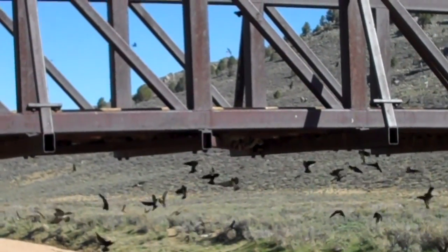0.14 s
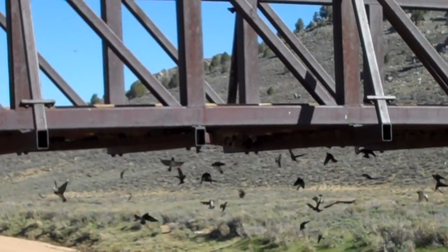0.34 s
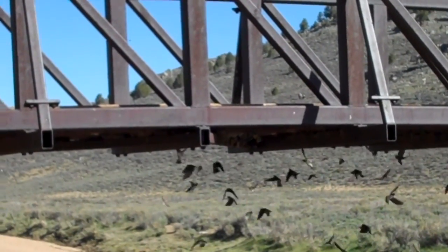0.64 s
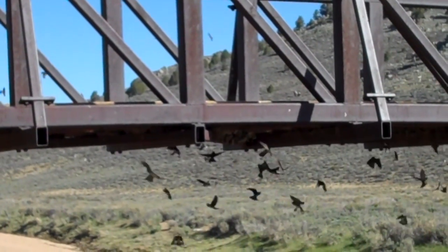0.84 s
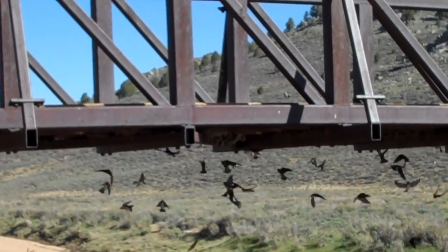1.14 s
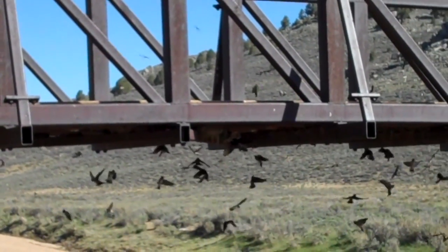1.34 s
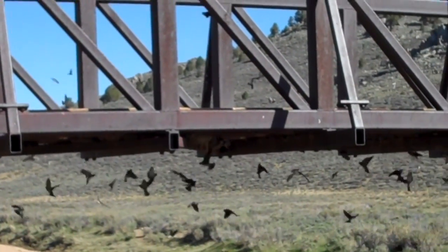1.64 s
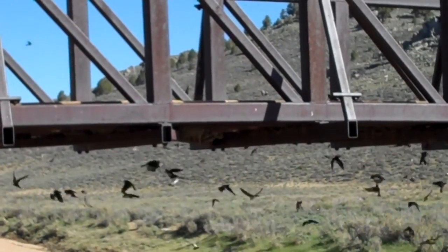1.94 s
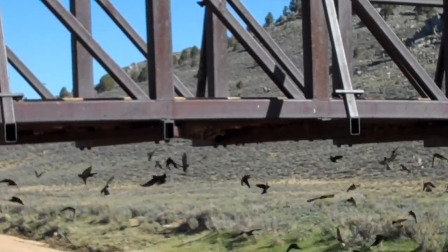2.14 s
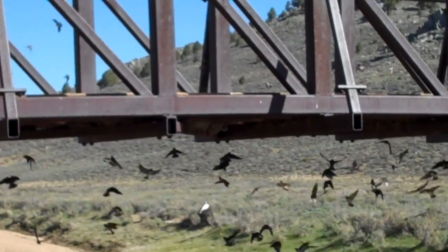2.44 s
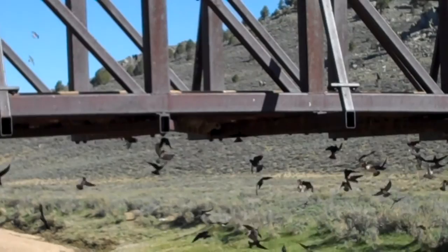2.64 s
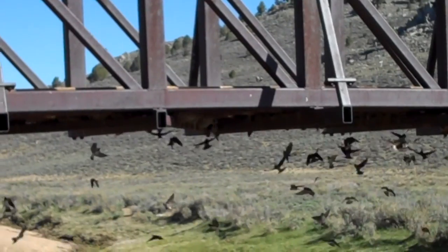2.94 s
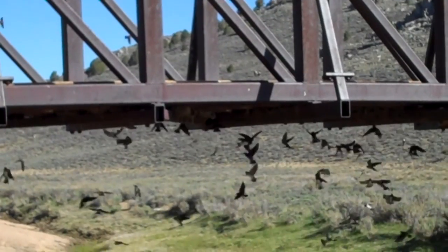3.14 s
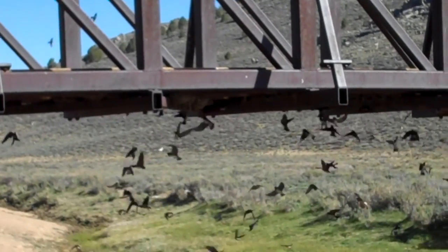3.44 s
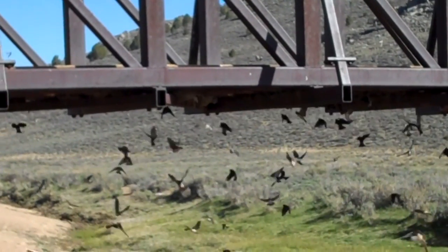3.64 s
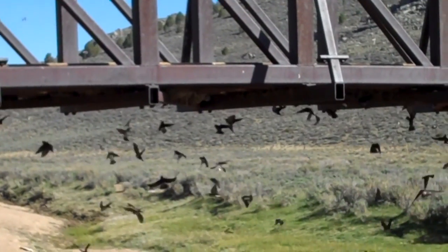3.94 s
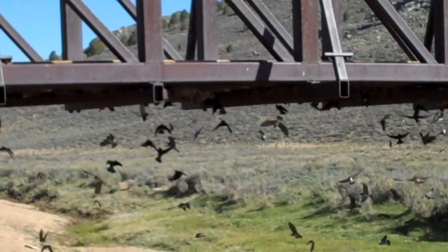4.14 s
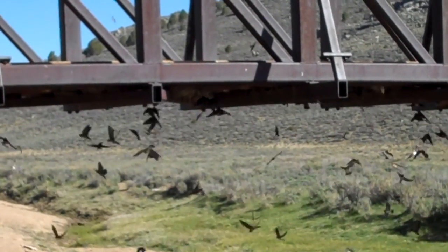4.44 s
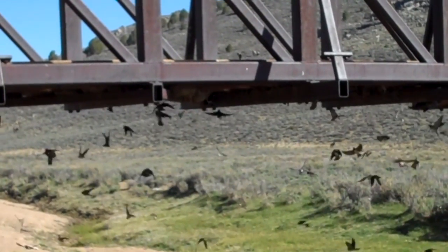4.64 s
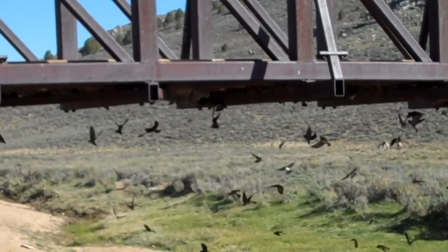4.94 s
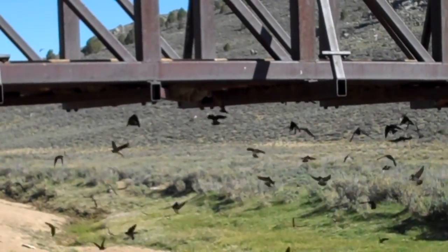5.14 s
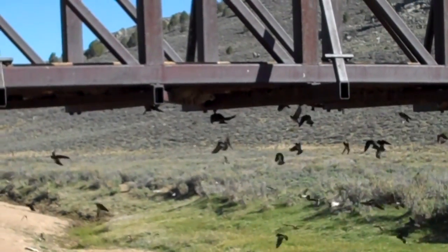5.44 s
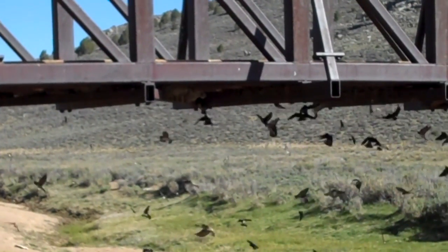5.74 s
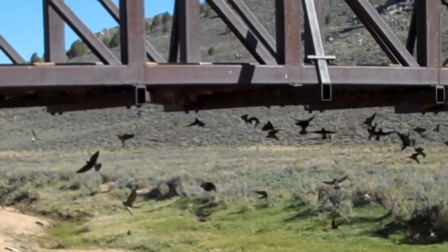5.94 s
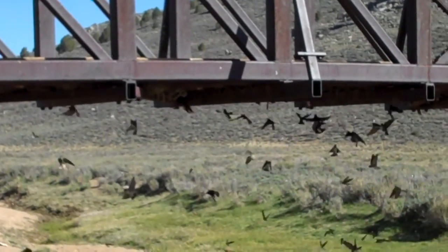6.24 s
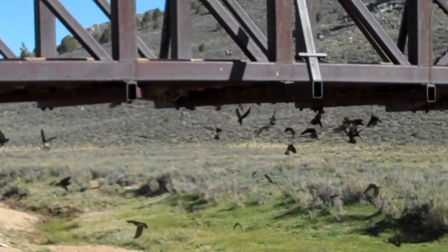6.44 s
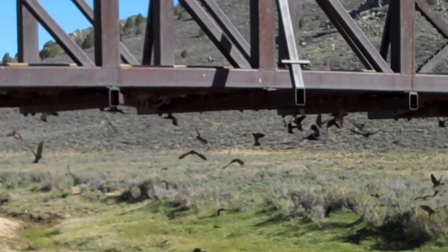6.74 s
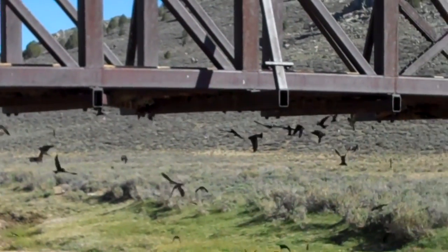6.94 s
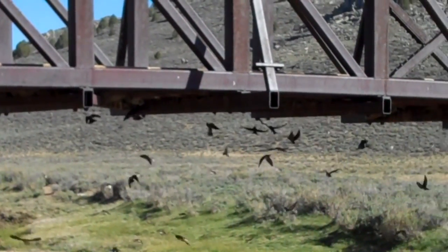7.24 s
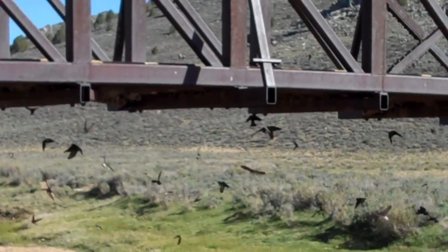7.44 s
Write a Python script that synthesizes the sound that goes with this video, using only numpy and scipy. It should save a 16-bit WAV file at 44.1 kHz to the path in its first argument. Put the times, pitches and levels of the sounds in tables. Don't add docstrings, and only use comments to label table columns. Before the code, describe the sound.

Dense outdoor bird chatter already in full swing: quick gliding squeaks, steep chirps and stronger rough two-toned cries from near swallows, over a constant haze of distant birds. Strong cries crowd the first two seconds, then come more sparsely; late on, small squeaks and snapping ticks remain. Three faint steel pings and one soft low air bump fall near three seconds. Gentle stream noise, brief reflections from bridge and banks, centred mono sound.

```python
import sys
import numpy as np
from scipy import signal
from scipy.fft import rfft, irfft, next_fast_len
from scipy.io import wavfile
from scipy.ndimage import uniform_filter1d, map_coordinates

SR = 44100
rng = np.random.default_rng(int(sys.argv[2]) if len(sys.argv) > 2 else 0)


def generate_wav(signal):
    frames = np.transpose(np.atleast_2d(signal))
    scaled = np.clip(frames, -1, 1) * 32767
    pcm = np.round(scaled).astype(np.int16)
    wavfile.write(sys.argv[1], SR, pcm)


def amplitude_ratio(level_db):
    exponent = np.asarray(level_db, float) / 20
    return 10 ** exponent


N = 335050


def unit(x):
    return x / np.sqrt(np.mean(x ** 2) + 1e-20)


def coloured(x, points):
    m = next_fast_len(N + 8192)
    hz, db = np.transpose(points)
    log_hz = np.log(np.fft.rfftfreq(m, 1 / SR) + 1)
    gain = amplitude_ratio(np.interp(log_hz, np.log(hz + 1), db))
    return unit(irfft(rfft(x, m) * gain, m)[:N])


def wobble(rate_hz, size=N):
    knots = rng.standard_normal(int(size * rate_hz / SR) + 4)
    return map_coordinates(knots, [np.arange(size) * rate_hz / SR])


def bridge(x, wet_db, t60_s=0.32):
    t = np.arange(SR // 3) / SR
    tail = rng.standard_normal(len(t)) * amplitude_ratio(-60 * t / t60_s) * (t > .004)
    tail /= np.linalg.norm(tail)
    return x + amplitude_ratio(wet_db) * signal.fftconvolve(x, tail)[:N]


def bowed(rows, holds):
    return [(s, length, start, end + holds * (start - end), end, db)
            for s, length, start, end, db in rows]


def straight(rows, hz_per_s):
    return [(s, length, hz - hz_per_s * length / 2, hz, hz + hz_per_s * length / 2, db)
            for s, length, hz, db in rows]


def glide_hz(u, start, middle, end):
    return middle + (end - start) * (u - .5) + 2 * (start + end - 2 * middle) * (u - .5) ** 2


GRIT_DB = 1.8
BUZZ_SHARE = .23


def squeaks(rows, overtones_db, flutter_db, waver, edge, buzz=0):
    out = np.zeros(N + SR)
    shake = np.array([wobble(70) for _ in range(7)])
    grit_db = GRIT_DB * wobble(400)
    order = np.arange(1, len(overtones_db) + 1)[:, None]
    for s, length, start, middle, end, db in rows:
        u = np.arange(0, 1, 1 / (length * SR))
        at = round(s * SR)
        part = slice(min(at, N - len(u)), min(at, N - len(u)) + len(u))
        hz = glide_hz(u, start, middle, end) * (1 + waver * shake[-1, part])
        phase = 2 * np.pi * np.cumsum(hz) / SR
        flutter = flutter_db * shake[:len(order), part]
        sizes = amplitude_ratio(np.array(overtones_db)[:, None] + flutter + grit_db[part])
        stack = np.sum(sizes * np.sin(order * phase + order ** 2), axis=0)
        stack *= 1 + buzz * np.cos(BUZZ_SHARE * phase)
        out[at:at + len(u)] += amplitude_ratio(db + 5) * np.sin(np.pi * u) ** edge * stack
    return out[:N]


# start_s, length_s, start_hz, end_hz, level_db
FACING_DUETS = [
    (.392, 0.1, 5040, 2996, -49.5),
    (.96, 0.12, 4300, 3100, -55.5),
    (1.2, .11, 4460, 2830, -47.5),
    (2.074, 0.11, 4240, 2650, -53),
]
# start_s, length_s, start_hz, end_hz, level_db
TURNED_DUETS = [
    (.16, 0.13, 4490, 3040, -49.5),
    (.605, 0.16, 4130, 2460, -54),
    (1.874, 0.13, 4500, 2940, -52),
    (5.9, 0.079, 4400, 3550, -54),
]
# start_s, length_s, start_hz, end_hz, level_db
ARCHED_DUETS = [
    (0.0, 0.099, 4230, 2940, -44.5),
    (3.69, 0.12, 4300, 2940, -50.5),
    (4.3, 0.11, 4260, 2920, -47.5),
    (5.215, 0.12, 4370, 3300, -51.5),
    (.785, .12, 4230, 2810, -53),
    (2.855, 0.13, 4330, 3033, -47),
]
MIX = np.array([(1, 0), (0, 1), (2, 0), (1, 1), (-1, 2), (0, 2), (2, 1), (1, 2), (3, 1), (0, 3), (2, 2)])
MIX_DB = [0, 0.5, -4, -2, -9, -5.5, -11, -13, -18, -20, -20]
# hz, level_db
THROAT = [(1500, -10), (3300, 0.5), (5200, -0.5), (7000, -8), (10000, -6), (14000, -30)]
DUET_HOLDS, ARCH_HOLDS = .4, .74
LOWER_HZ, LOWER_SHARE = 300.7, .5001
BEAM_FROM_HZ, DULL_DB_PER_HZ, BRIGHT_DB = 4400, -0.0066, 2


def duets(flutter_db, edge):
    out = np.zeros(N + SR)
    throat_hz, throat_db = np.transpose(THROAT)
    facing = bowed(FACING_DUETS, DUET_HOLDS)
    turned = bowed(TURNED_DUETS, DUET_HOLDS) + bowed(ARCHED_DUETS, ARCH_HOLDS)
    for k, (s, length, start, middle, end, db) in enumerate(facing + turned):
        u = np.arange(0, 1, 1 / (length * SR))
        at = round(s * SR)
        upper = glide_hz(u, start, middle, end) * (1 + 0.0049 * wobble(90.4, size=len(u)))
        lower = LOWER_HZ + LOWER_SHARE * upper
        hz = np.asarray(MIX) @ np.array([lower, upper])
        flutter = flutter_db * np.array([wobble(76.5, size=len(u)) for _ in MIX])
        sizes_db = np.interp(hz, throat_hz, throat_db) + np.c_[MIX_DB] + flutter
        sizes_db += GRIT_DB * wobble(398, size=len(u))
        if k < len(facing):
            sizes_db += BRIGHT_DB * np.clip((hz - BEAM_FROM_HZ) / 900, 0, 1)
        else:
            sizes_db += DULL_DB_PER_HZ * np.maximum(hz - BEAM_FROM_HZ, 0)
        tones = amplitude_ratio(sizes_db) * np.sin(2 * np.pi * np.cumsum(hz, axis=1) / SR)
        out[at:at + len(u)] += amplitude_ratio(db) * np.sin(np.pi * u) ** edge * tones.sum(axis=0)
    return out[:N]


# start_s, length_s, start_hz, end_hz, level_db
ARCHES = [(.153, .118, 2500, 1990, -50.5), (3.9, .045, 2120, 1780, -55), (0.0, 0.081, 2356, 1700, -49.5),
          (.597, .069, 2195, 1970, -59), (.715, 0.07, 2620, 2510, -58), (1.08, 0.023, 2130, 2010, -52.5),
          (1.11, 0.098, 2050, 2120, -63), (6.475, 0.062, 2385, 1890, -60.5), (2.02, 0.061, 2200, 1850, -58),
          (2.072, 0.074, 2230, 2040, -47.5), (2.307, .1, 2370, 1810, -61),
          (3.195, 0.058, 2000, 1880, -52.5), (3.695, 0.049, 2395, 2297, -53),
          (3.93, 0.057, 2130, 1950, -59), (3.9, .09, 1700, 1247, -58), (4.625, 0.054, 1960, 1640, -52),
          (1.92, 0.053, 2200, 2020, -56.5), (4.255, 0.054, 1755, 1690, -49.5),
          (4.24, 0.059, 2640, 2280, -60.5), (5.497, 0.11, 3090, 2190, -62), (6.316, 0.065, 2480, 2170, -54),
          (6.305, .04, 2130, 1900, -57), (6.225, .075, 2040, 1680, -59), (7.325, 0.15, 1494, 1160, -57.5)]
# start_s, length_s, middle_hz, level_db
SLIDES = [(.2, .068, 1750, -56), (.618, 0.042, 2500, -65), (0.91, 0.038, 2400, -53.5),
          (3.9, 0.043, 1200, -60), (2.347, .118, 1680, -58.5), (3.209, 0.047, 1664, -54.5),
          (4.7, 0.071, 1800, -74), (4.47, .04, 2000, -59), (2.3, 0.053, 1870, -56), (5.3, .05, 2000, -62),
          (3.83, 0.04, 1450, -61), (5.74, .03, 2600, -61), (5.938, .065, 2130, -58),
          (3.305, .04, 2180, -59), (6.025, .04, 2130, -52), (4.35, .04, 2050, -56), (.85, .04, 1680, -55.5),
          (7.3, 0.15, 1700, -73), (6.861, .064, 1800, -57), (7.105, 0.057, 2150, -55.5)]
# start_s, length_s, middle_hz, level_db
DIVES = [(.031, .045, 2600, -65), (.205, 0.083, 2700, -66), (1.005, 0.047, 2470, -51),
         (1.172, .048, 2650, -59), (1.935, 0.04, 2760, -67), (2.434, 0.073, 2510, -59),
         (3.064, 0.046, 2560, -69), (3.268, .05, 2750, -60), (4.756, 0.056, 2650, -58),
         (5.267, 0.067, 2765, -58), (5.738, 0.041, 2490, -78), (6.01, 0.045, 2820, -59),
         (6.066, 0.06, 2380, -54), (6.565, 0.027, 2520, -66), (6.85, .04, 2760, -63),
         (7.183, 0.063, 2500, -60), (7.37, 0.071, 2586, -55.5), (2.85, 0.029, 2580, -55),
         (2.14, 0.059, 2420, -55), (1.88, 0.046, 2750, -64), (.45, .055, 2600, -55),
         (3.165, 0.051, 2630, -59.5), (4.34, 0.039, 2650, -59), (7.54, 0.062, 2070, -55)]
# start_s, length_s, middle_hz, level_db
PIPS = [(.937, 0.095, 2260, -57), (1.288, 0.023, 2590, -53), (1.601, 0.029, 1800, -54.5),
        (1.805, 0.02, 2540, -56), (2.156, 0.011, 2750, -54), (2.553, 0.13, 1452, -59.5),
        (2.68, .065, 1670, -53), (3.39, .08, 1680, -63), (3.372, 0.095, 2050, -63),
        (3.523, 0.043, 1660, -65), (3.636, .04, 2120, -54), (4.751, 0.087, 2240, -57),
        (4.919, .051, 1910, -60), (5.053, 0.033, 2010, -57), (5.36, 0.04, 2860, -63),
        (5.438, .045, 2040, -53.5), (5.355, .05, 1740, -63), (5.366, .039, 1730, -70),
        (5.851, 0.092, 2425, -57.5), (6.431, 0.034, 2100, -57), (6.44, 0.083, 1684, -57.5),
        (6.481, .066, 1370, -57), (6.626, 0.053, 1630, -60), (7.084, 0.051, 1710, -57.5)]
# start_s, length_s, middle_hz, level_db
FLICKS = [
    (.38, 0.035, 1770, -59),
    (1.671, 0.024, 1900, -53),
    (4.72, .04, 2000, -57),
    (4.3, 0.029, 1850, -60),
    (3, 0.017, 2150, -52.5),
    (4.588, 0.041, 1640, -56.5),
    (5.455, .05, 1600, -59),
]
SQUEAK_DB = [-16.5, 0, -18, -26, -35, -39]
SLIDE_HZ_PER_S, DIVE_HZ_PER_S, PIP_HZ_PER_S, FLICK_HZ_PER_S = -6500, -11500, -1800, 6600


def squeaky_calls():
    rows = bowed(ARCHES, ARCH_HOLDS)
    rows += straight(SLIDES, SLIDE_HZ_PER_S)
    rows += straight(DIVES, DIVE_HZ_PER_S)
    rows += straight(PIPS, PIP_HZ_PER_S)
    rows += straight(FLICKS, FLICK_HZ_PER_S)
    return squeaks(rows, SQUEAK_DB, flutter_db=1.5, waver=0.0045, edge=0.3, buzz=.15)


# start_s, length_s, start_hz, end_hz, level_db
SWOOPS = [(0.0, 0.088, 2360, 1980, -62.5), (.969, 0.076, 3170, 2330, -60.5),
          (4.36, 0.032, 2720, 2280, -56.5), (1.52, 0.062, 2080, 1840, -65), (1.655, 0.11, 3020, 2270, -64),
          (2.24, 0.11, 1344, 2410, -68), (2.84, .055, 3000, 2290, -60.5), (3.178, 0.034, 2730, 2270, -57),
          (3.967, .12, 3320, 2594, -66), (4.246, 0.085, 2660, 2280, -65), (4.716, 0.051, 1616, 2220, -63),
          (5.282, 0.047, 2950, 2456, -58.5), (5.972, 0.058, 3640, 2870, -54.5),
          (6.035, 0.069, 2750, 2220, -59.5), (7.058, 0.094, 2650, 2000, -64)]
# start_s, length_s, middle_hz, level_db
LILTS = [(.667, .11, 1910, -63.5), (2.588, 0.12, 1345, -70), (2.733, 0.046, 2180, -57.5),
         (2.829, 0.045, 992, -69), (4.722, 0.13, 1387, -67.5), (4.992, 0.16, 1500, -74),
         (5.967, 0.07, 2036, -60), (6.481, 0.055, 1358, -62), (6.75, 0.11, 1372, -70.5),
         (6.925, 0.05, 1314, -65), (.42, 0.079, 1395, -76), (.61, .1, 1440, -74), (1.07, 0.085, 1070, -77),
         (1.17, 0.067, 1420, -71), (1.86, 0.036, 1238, -71.5), (1.94, .13, 1440, -75),
         (3.44, 0.11, 1510, -77), (5.59, .08, 1514, -69), (5.96, .05, 620, -75), (6.57, .05, 1425, -67),
         (7.03, 0.1, 1624, -71), (7.46, 0.077, 1040, -71.5)]
# start_s, length_s, middle_hz, level_db
HELD = [(.519, 0.18, 2090, -71), (.792, 0.05, 2600, -61), (1.369, 0.042, 2640, -61.5),
        (1.877, 0.052, 2104, -66), (2.33, 0.036, 960, -64.5), (2.93, 0.055, 3500, -59),
        (2.98, 0.087, 2016, -70), (3.349, 0.13, 811, -71), (3.202, .014, 850, -65), (3.24, .012, 820, -69),
        (3.871, 0.13, 1990, -67), (4.455, 0.028, 2730, -60), (5.412, 0.12, 1900, -64),
        (5.607, 0.05, 2013, -67), (6.208, 0.088, 2044, -62.5), (6.31, 0.094, 2360, -62),
        (7.137, 0.067, 1370, -69), (0.0, 0.027, 1035, -67.5), (.1, 0.2, 750, -78.5),
        (.2, 0.19, 1043, -77.5), (.8, 0.11, 772, -78.5), (1.48, 0.17, 1011, -77), (2.58, 0.22, 809, -79),
        (5.27, 0.053, 964, -71.5), (7.41, .06, 1237, -66), (4.0, 0.095, 2680, -60), (5.2, 0.17, 2585, -64)]
MELLOW_DB = [4, -11, -17, -26, -37, -43]
SWOOP_HOLDS, LILT_HZ_PER_S, HELD_HZ_PER_S = .45, 2190, -59


def mellow_calls():
    rows = bowed(SWOOPS, SWOOP_HOLDS)
    rows += straight(LILTS, LILT_HZ_PER_S)
    rows += straight(HELD, HELD_HZ_PER_S)
    return squeaks(rows, MELLOW_DB, flutter_db=2, waver=0.0041, edge=0.41)


def crowd(count, spread_db):
    when, long, pitch, fall, bend, size = rng.random((count, 6)).T
    start_s = (np.arange(count) + 2 * when) / (count + 2) * N / SR
    length_s = .025 + .065 * long
    start = 1700 + 1300 * pitch
    end = start * (1.0 - .36 * fall)
    middle = (start + end) / 2 * (.97 + .09 * bend)
    rows = np.transpose([start_s, length_s, start, middle, end, spread_db * size])
    overtones_db = [-4.5, -0.5, -7, -11.5, -13, -14.0]
    return unit(squeaks(rows, overtones_db, flutter_db=3.5, waver=0.006, edge=0.93, buzz=.55))


# time_s, chatter_db, rasp_db
FLOCK = [(0.0, -49.5, -51), (0.36, -53.5, -82), (0.42, -50.5, -52), (0.55, -51, -76), (0.99, -50, -58),
         (1.14, -51.5, -73), (1.22, -49.5, -62), (1.33, -50, -76), (2.18, -56, -62.5), (2.56, -56.5, -87),
         (2.6, -52.5, -53.5), (2.69, -53, -59.5), (3.8, -52.5, -61), (3.91, -47, -61), (4.05, -51, -65),
         (4.8, -50, -58.5), (6.39, -52.5, -63.5), (6.64, -53.5, -66), (7.6, -51, -68)]
# hz, level_db_per_hz
CHATTER = [(710, -43), (1200, -13), (1430, 4.5), (1670, -16), (2720, -1), (4180, -6), (5200, -3.5),
           (6700, -12), (9000, -39), (11700, -54), (19800, -120)]
# hz, level_db_per_hz
RASP = [(3240, -21.5), (5500, -10), (6340, -3.5), (8170, -12), (8520, -13), (10700, -9.5), (13800, -32)]


def far_flock():
    time_s, chatter_db, rasp_db = np.transpose(FLOCK)
    t = np.arange(N) / SR
    birds = crowd(count=640, spread_db=1.5)
    blur = amplitude_ratio(1.84 * wobble(12)) * rng.standard_normal(N)
    chatter = bridge(birds, -3.9) + amplitude_ratio(-3.5) * coloured(blur, CHATTER)
    chatter = coloured(chatter, [(600, -35), (1500, -5.0), (3000, 4.5), (5000, -2), (7000, -9.0), (14000, -22.5)])
    air = amplitude_ratio(-1.0 + 1.8 * wobble(25)) * rng.standard_normal(N)
    rasp = coloured(birds + air, RASP)
    chatter *= amplitude_ratio(np.interp(t, time_s, chatter_db) - 1.5)
    return chatter + amplitude_ratio(np.interp(t, time_s, rasp_db) - 6.5) * rasp


def hiss(calls, breathy_db=-20):
    loudness = np.sqrt(np.abs(uniform_filter1d(calls ** 2, size=300)))
    return amplitude_ratio(breathy_db + 2.8 * wobble(40)) * loudness * coloured(rng.standard_normal(N), RASP)


# hz, level_db_per_hz
STREAM = [(12, -33), (20, -4), (30, -6.5), (54, -13.5), (284, -16.5), (997, -7.5), (1180, -7.5),
          (1420, -6.5), (1680, -11), (2740, -6.5), (4130, -10.5), (10200, -25.5), (13800, -29.5)]


def stream():
    return amplitude_ratio(-58.5 + 0.4 * wobble(3.13)) * coloured(rng.standard_normal(N), STREAM)


# start_s, length_s, start_hz, end_hz, level_db
SHRILL = [(.017, 0.11, 2500, 2080, -73), (.098, 0.13, 2510, 2330, -70), (.255, .083, 2280, 1660, -68),
          (.696, 0.041, 2230, 2190, -64.5), (.966, 0.026, 2070, 1920, -62.5),
          (1.941, .034, 1473, 1316, -58.5), (3.238, 0.098, 1703, 1420, -66),
          (3.247, 0.031, 2110, 2150, -61), (3.868, 0.055, 2400, 2380, -69), (4.977, .062, 1490, 1500, -74),
          (5.383, .155, 1410, 1500, -67), (6.064, 0.016, 2680, 2590, -54), (6.24, 0.038, 1940, 1945, -58),
          (6.228, 0.037, 2750, 2590, -69), (6.933, 0.1, 1274, 1540, -69), (7.302, 0.063, 1560, 1370, -75)]
SHRILL_DB = [-8.5, -3, 0.5, -13, -15, -37]
SHRILL_HOLDS = 0.41


def shrill_calls():
    return squeaks(bowed(SHRILL, SHRILL_HOLDS), SHRILL_DB, flutter_db=5.5, waver=0.0035, edge=0.3)


# start_s, peak_db
TICKS = [(0.38, -55), (1.072, -46), (1.5198, -40.5), (1.712, -58), (1.41, -56), (6.3, -52), (5.2, -51),
         (.94, -53), (3.5, -50), (3.11, -59), (3.018, -50), (6.165, -59), (0.57, -59), (5.026, -49),
         (5.5967, -45), (5.7319, -49), (5.7713, -52), (5.8252, -51), (3.432, -51), (5.6371, -47),
         (5.676, -44), (5.849, -49), (6.2961, -43), (6.547, -43)]
SNAP_HZ, SNAP_T60_S = 8800, 0.018


def ticks():
    out = np.zeros(N + SR)
    t = np.arange(SR // 50) / SR
    for s, db in TICKS:
        crackle = np.diff(rng.standard_normal(len(t) + 1))
        out[round(s * SR):][:len(t)] += amplitude_ratio(db - 13 - 60 * t / SNAP_T60_S) * crackle
    lowpass = signal.butter(2, SNAP_HZ, fs=SR, output="sos")
    return signal.sosfilt(lowpass, out[:N]) * amplitude_ratio(11)


# hz, t60_s, first_place_db, second_place_db, third_place_db
STEEL = [(5070, 0.14, -49, -48, -78), (6030, 0.11, -70, -77, -48.5), (7300, .088, -75, -53, -60),
         (7547, .06, -48, -75, -72), (9098, .11, -50.5, -73, -64), (9700, .08, -54, -73, -67),
         (10380, 0.14, -75, -51, -51), (11340, .04, -48, -72, -59), (13900, .08, -62, -60, -70)]
PINGS = [
    2.592,
    2.739,
    3.015,
]


def pings():
    out = np.zeros(N)
    t = np.arange(SR // 4) / SR
    hz, t60_s, *places_db = np.transpose(STEEL)[:, :, None]
    for s, modes_db in zip(PINGS, places_db):
        ring = amplitude_ratio(modes_db - 60 * t / t60_s) * np.sin(2 * np.pi * hz * t)
        out[round(s * SR):][:len(t)] += ring.sum(axis=0) * (1 - np.exp(-t / 0.00072))
    return out


# centre_s, level_db, pitch_hz
PUFF = (3.176, -52.5, 124)


def puff():
    s, db, hz = PUFF
    t = np.arange(N) / SR - s
    return amplitude_ratio(db) * np.sin(2 * np.pi * hz * t) * np.exp(-(t / 0.0034) ** 2)


# start_s, length_s, start_hz, end_hz, level_db
RISES = [
    (5.502, .06, 1620, 2110, -48),
    (5.478, .082, 1980, 2300, -57),
    (3.25, .022, 1850, 2180, -54),
    (6.35, .045, 1800, 2040, -56),
]
RISE_DB = [-15, 0, -20, -15, -22, -35]
RISE_HOLDS = .15


def rising_calls():
    return squeaks(bowed(RISES, RISE_HOLDS), RISE_DB, flutter_db=1.5, waver=0.003, edge=0.4)


def scene():
    solos = squeaky_calls() + mellow_calls() + shrill_calls() + rising_calls()
    pairs = duets(flutter_db=1.8, edge=0.23)
    near = bridge(solos + ticks(), -12) + bridge(pairs, -16.5)
    near += hiss(solos + pairs) + pings()
    return np.tile(near + far_flock() + stream() + puff(), (2, 1))


def low_pass(x):
    return signal.sosfilt(signal.butter(12, 13910, fs=SR, output="sos"), x)


def record(dry):
    mix = dry - .0004
    return low_pass(mix)


dry = scene()
out = record(dry)
generate_wav(out)
```